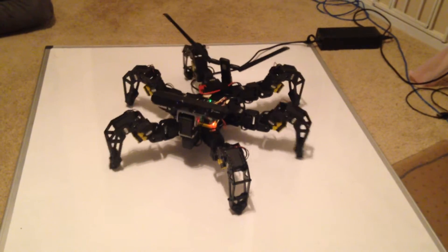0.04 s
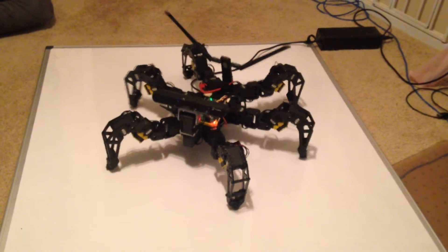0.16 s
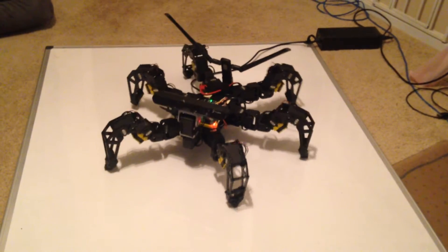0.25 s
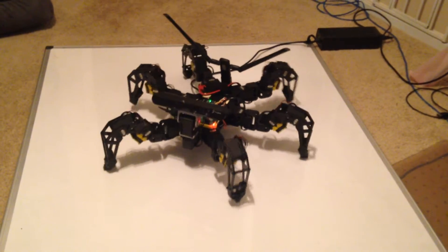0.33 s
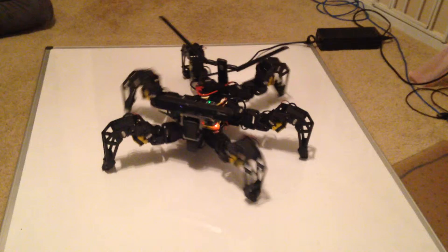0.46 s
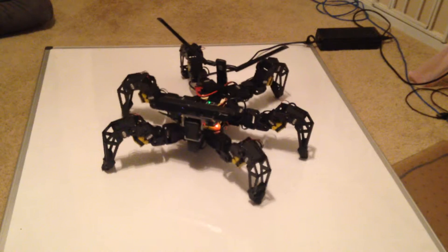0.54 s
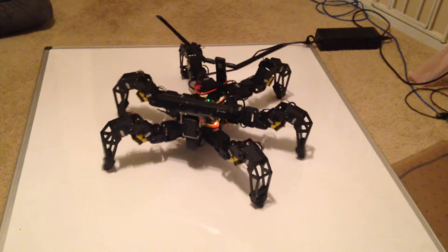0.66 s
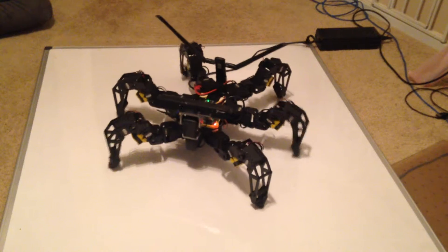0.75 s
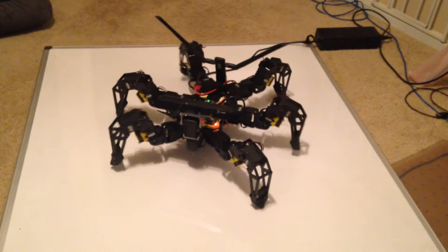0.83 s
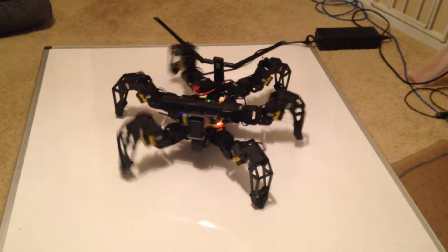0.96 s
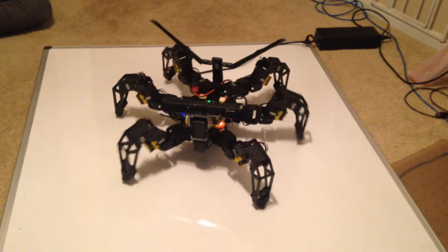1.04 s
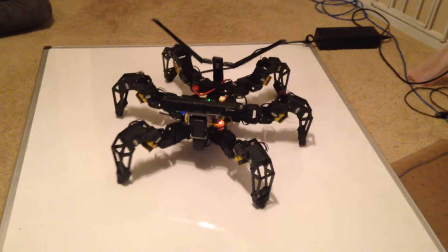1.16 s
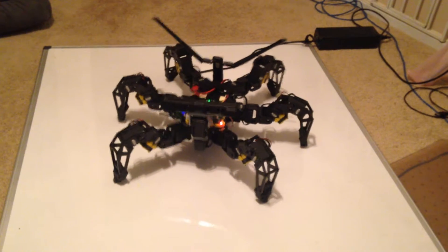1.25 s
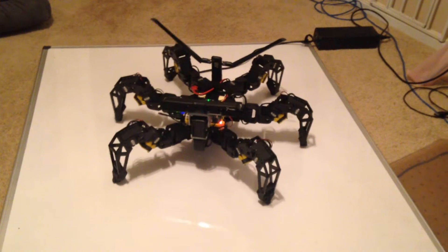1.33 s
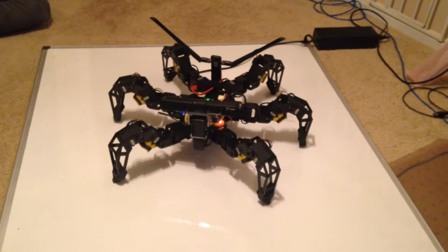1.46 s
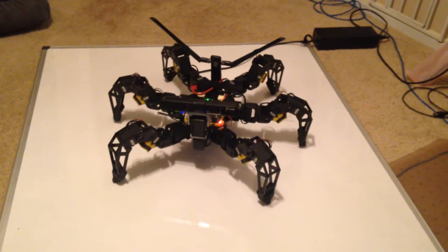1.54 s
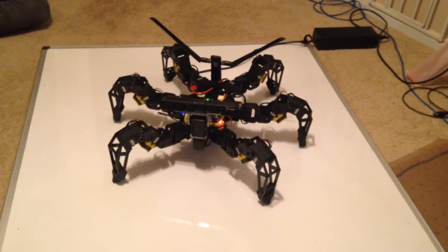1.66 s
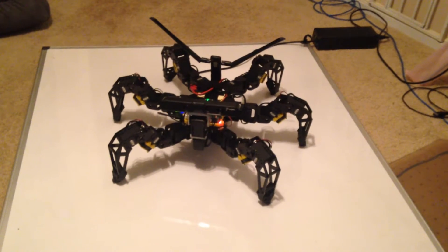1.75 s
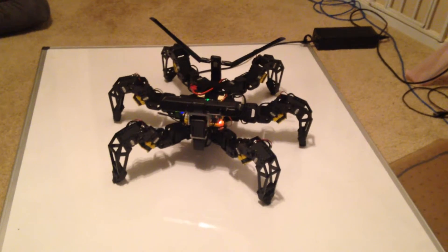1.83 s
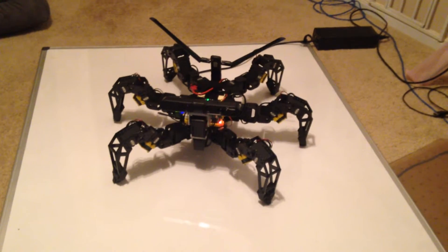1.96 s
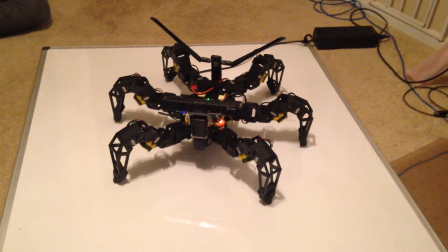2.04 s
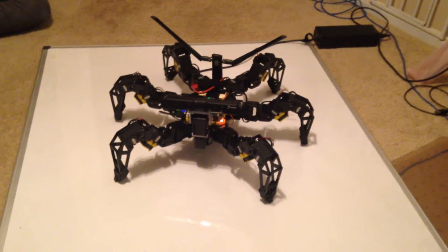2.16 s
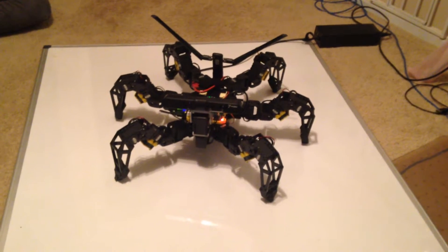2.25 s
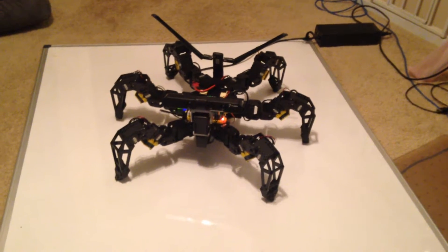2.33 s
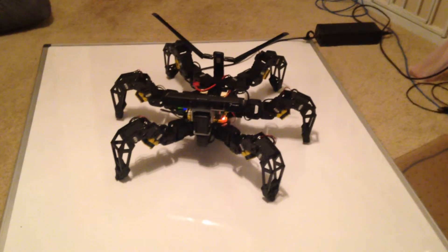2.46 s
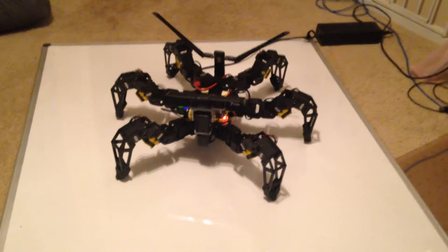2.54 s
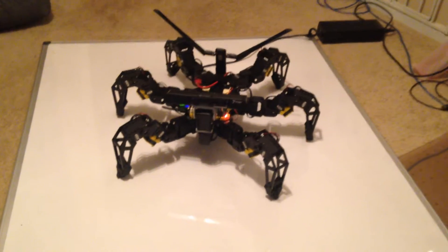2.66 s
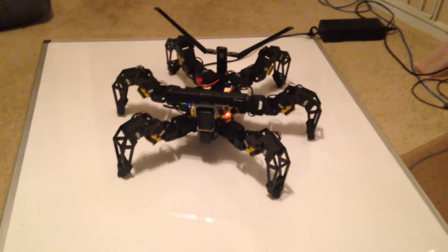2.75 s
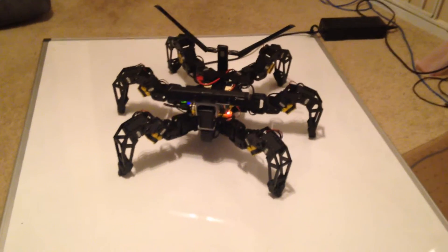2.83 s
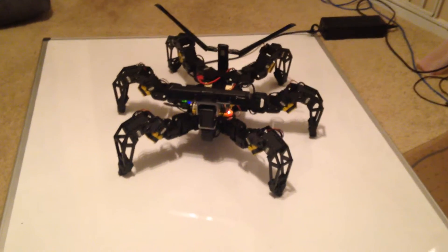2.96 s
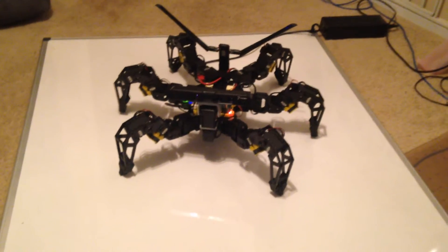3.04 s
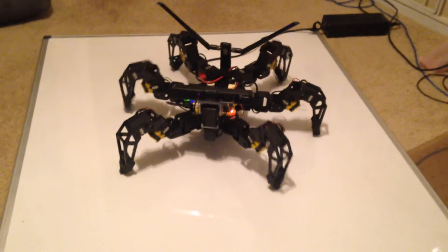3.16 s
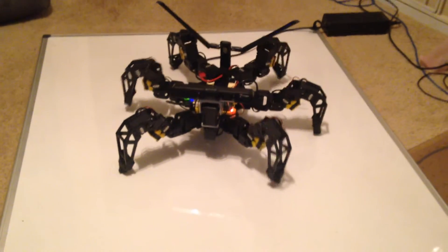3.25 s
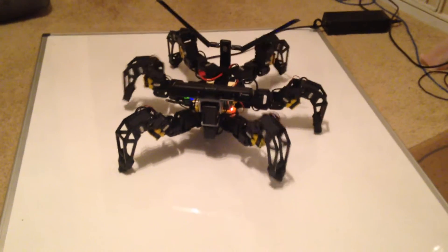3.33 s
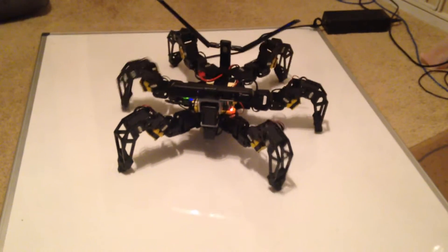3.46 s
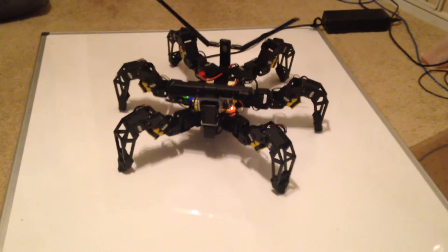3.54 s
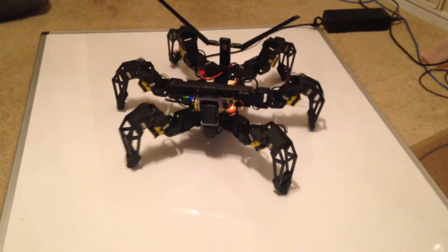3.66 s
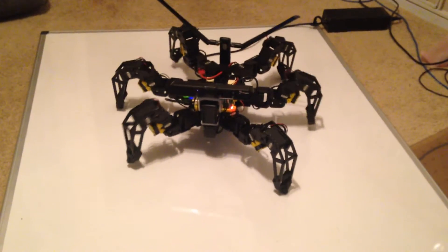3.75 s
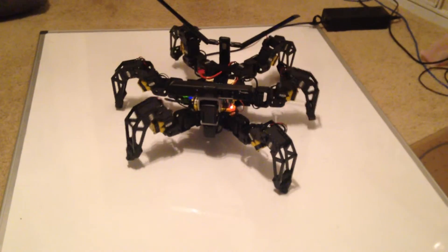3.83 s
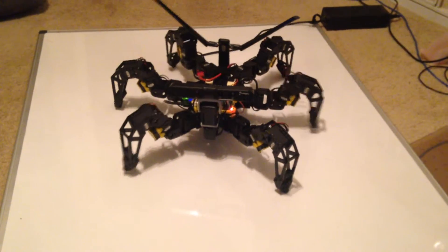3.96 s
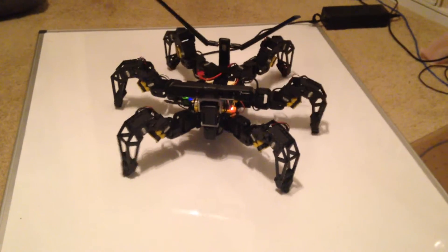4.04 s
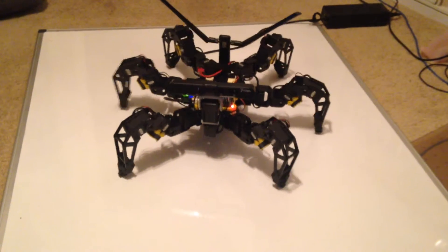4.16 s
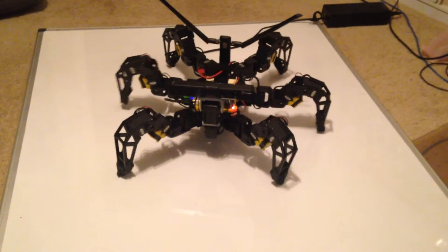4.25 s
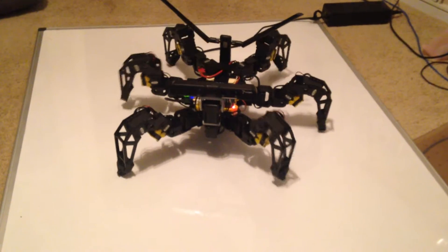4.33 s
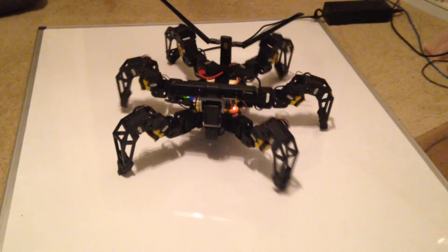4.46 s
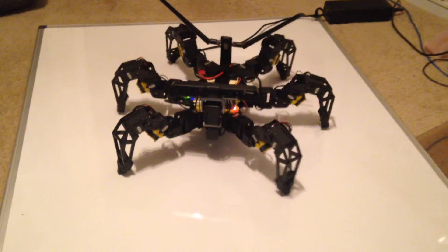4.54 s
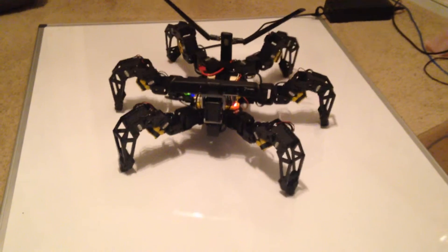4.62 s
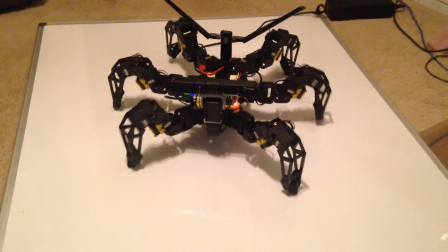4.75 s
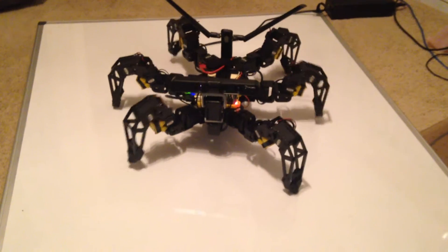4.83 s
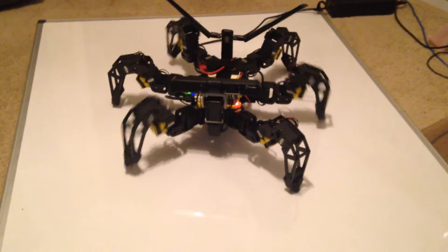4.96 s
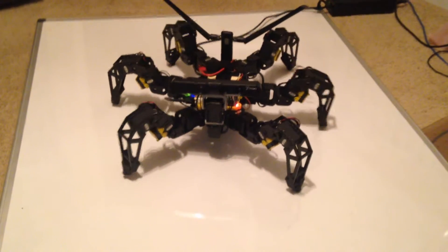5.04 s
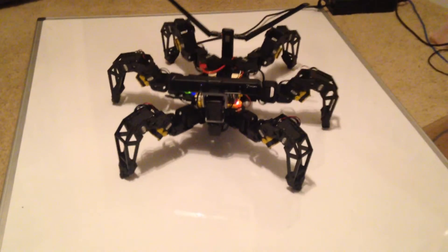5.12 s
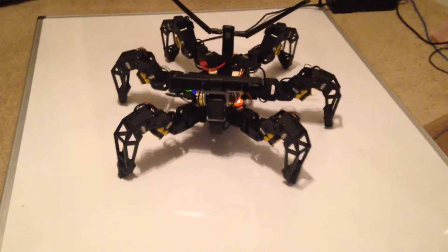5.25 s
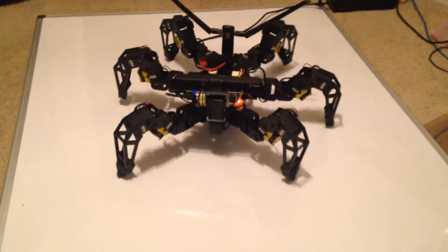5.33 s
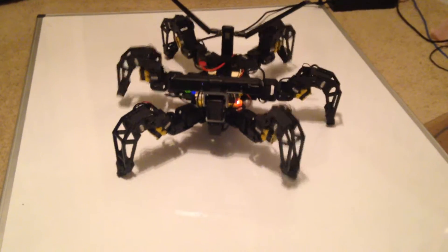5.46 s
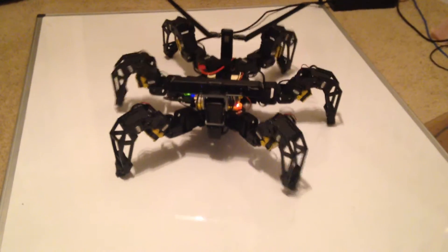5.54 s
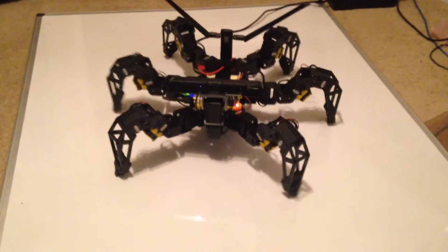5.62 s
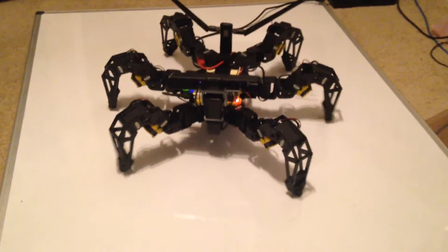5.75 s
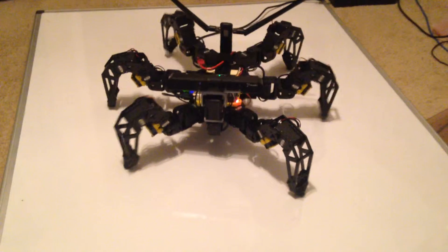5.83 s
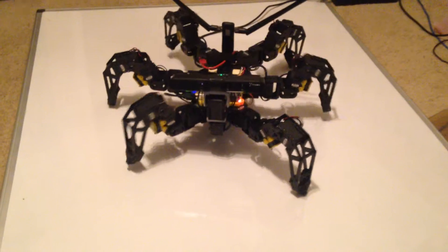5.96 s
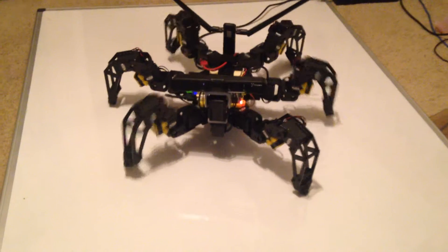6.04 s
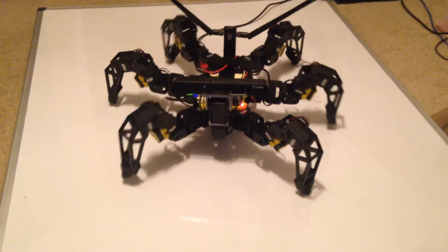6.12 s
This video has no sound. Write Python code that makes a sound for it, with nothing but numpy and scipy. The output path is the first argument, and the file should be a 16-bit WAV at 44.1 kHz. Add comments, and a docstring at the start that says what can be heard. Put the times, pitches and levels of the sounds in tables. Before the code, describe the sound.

Plastic feet thud and click on a hard board amid grainy servo rasps; a short pause leaves a low buzz and faint fan whine.

```python
"""A six-legged robot walks on a whiteboard lying on a carpet, rests for under two seconds and walks on.
Its plastic feet thump and skid by ringing the board; joints and servos add clicks, short bursts of noise.
The servos rasp in grains of noise while they move and buzz in low pulses while they hold the pose.
Small cooling fans whine as steady tones over rushing air in a quiet room."""
import sys
import numpy as np
from scipy import signal
from scipy.fft import rfft, irfft, next_fast_len
from scipy.io import wavfile

SR = 44100
rng = np.random.default_rng(int(sys.argv[2]) if len(sys.argv) > 2 else 0)


def digitize_waveform(pressure):
    """Quantize a signal to 16-bit integers and store it at the path in sys.argv[1].

    Rows of a 2-D input are taken as channels; values are limited to [-1, 1].
    """
    field = np.atleast_2d(pressure).T
    bounded = np.clip(field, -1, 1)
    quanta = np.round(bounded * 32767).astype(np.int16)
    wavfile.write(sys.argv[1], SR, quanta)


N = 272962   # length in samples
TIME = np.arange(N) / SR   # seconds


def from_db(db):
    """Turn decibels into a gain."""
    return 10 ** (np.asarray(db) / 20)


def rms_one(x):
    """Scale to an rms (average strength) of one."""
    return x / np.sqrt(np.mean(x ** 2) + 1e-20)


def in_time(rows):
    """Draw straight lines between table rows: one value per sample for each column."""
    start_s, *columns = np.transpose(rows)
    return [np.interp(TIME, start_s, column) for column in columns]


def at_hz(points, hz):
    """Read a table at any pitch, with pitch spaced in octaves (a log scale)."""
    table_hz, value = np.transpose(points)
    return np.interp(np.log(np.maximum(hz, 1)), np.log(table_hz), value)


def cut(x, hz, kind, order=2):
    """Filter away the sound outside a range of pitch (Butterworth filter)."""
    safe_hz = np.clip(hz, 10, .45 * SR)
    sections = signal.butter(order, safe_hz, kind, fs=SR, output="sos")
    return signal.sosfilt(sections, x + 1e-18)


def drift(rate_hz):
    """Wander smoothly by chance around zero, with an rms of one."""
    hz = np.fft.rfftfreq(N, 1 / SR)
    slowed = rfft(rng.standard_normal(N)) / (1 + (hz / rate_hz) ** 2)
    return rms_one(irfft(slowed, N))


def coloured(x, spectrum):
    """Shape the spectrum of a sound; white noise keeps its power."""
    size = next_fast_len(N + 4096)   # spare room at the end
    gain = from_db(at_hz(spectrum, np.fft.rfftfreq(size, 1 / SR)))
    return irfft(rfft(x, size) * rms_one(gain), size)[:N]


def add(out, start_s, sound):
    """Mix a sound in at its start time."""
    i = max(0, round(start_s * SR))
    out[i:i + len(sound)] += sound[:N - i]


def tone(hz):
    """Play a sine of rms one that follows a pitch curve."""
    return np.sqrt(2) * np.sin(2 * np.pi * np.cumsum(hz) / SR)


# the robot stands still between these times; it winds down slowly and sets off at once
REST_FROM_S, REST_TO_S = 1.544, 3.24
STOP_S, START_S = 0.091, .025   # length of each change


def walking():
    """Return 1 while the robot walks and 0 while it rests."""
    before_rest = np.clip((REST_FROM_S - TIME) / STOP_S + .5, 0, 1)
    after_rest = np.clip((TIME - REST_TO_S) / START_S + .5, 0, 1)
    return before_rest + after_rest


# three legs swap with the other three about twice a second:
# changeover_s (when the weight changes over), effort_db, stretch (times the usual duration)
STRIDES = [(0.166, -1, 0.9), (.7, .5, 1.04), (1.225, .7, 0.78), (3.11, -1.5, 1.0), (3.615, 1, 1.02),
           (4.155, -3, 0.88), (4.67, -.3, 0.92), (5.205, 1.1, 0.96), (5.77, 1, 0.99), (6.28, 1.5, 1.08)]
# the servo moves of every stride, lower, take the weight, lift, swing, before effort and stretch:
# middle_s (from the changeover), length_s, rasp_db
SERVO_MOVES = [(-.105, 0.13, -48.5), (.01, 0.2, -48.5), (0.171, 0.098, -46), (.305, 0.12, -54.5)]
# spectrum of the rasp: pitch_hz, level_db (per Hz)
RASP_COLOUR = [(500, 3), (1500, 0.5), (2600, 2.5), (3600, 7.5), (4800, 4.5), (5800, 3), (7200, 8),
               (9000, 2), (11000, 1.5), (13500, 10), (15500, 6)]
WALK_RASP_DB = -51.5   # small corrections between moves, before the trim


def gears(trim_db=0.6, grain_db=1.5, grain_rate_hz=450, flutter_db=1.0):
    """Gear teeth rasp in fine grains, swelling and fading with each move; at rest they fall silent."""
    power = from_db(WALK_RASP_DB) ** 2
    for changeover_s, effort_db, stretch in STRIDES:
        for middle_s, length_s, rasp_db in SERVO_MOVES:
            move_time = (TIME - changeover_s) / stretch - middle_s
            progress = np.clip(move_time / length_s + .5, 0, 1)
            swell = from_db(effort_db + rasp_db) * np.sin(np.pi * progress)
            power = power + swell ** 2
    grain_level_db = grain_db * drift(grain_rate_hz) + flutter_db * drift(29)
    grains = rms_one(rng.standard_normal(N) * from_db(grain_level_db))
    return from_db(trim_db) * coloured(walking() * np.sqrt(power) * grains, RASP_COLOUR)


HOLD_HZ = 218.2   # middle pitch of the holding buzz
BUZZ_WALK_DB, BUZZ_REST_DB = -63, -55.5   # base levels, walking and at rest
# overtones of the buzz: multiple (of its pitch), level_db
HOLD_ORDERS = [(1, 2), (2, -15.5), (3, -26)]
# spectrum of the pulse ticks: pitch_hz, level_db (per Hz)
TICK_COLOUR = [(1000, -24), (3500, -5), (6000, -16), (7200, 2), (11000, -17), (13200, 7), (14500, -4)]


def holding_buzz(tick_db=-6.0, waver=0.0099, sway_db=2.5, beat_depth=0.31, beat_hz=10):
    """Drive pulses hold the legs still: a low, beating buzz with thin regular ticks, loudest at rest."""
    level_db = BUZZ_REST_DB + (BUZZ_WALK_DB - BUZZ_REST_DB) * walking()
    hz = HOLD_HZ * (1 + waver * drift(8.2))
    buzz = sum(from_db(db) * tone(round(multiple) * hz) for multiple, db in HOLD_ORDERS)
    # the speed of the beating wanders around beat_hz
    beat = 1 + beat_depth * tone(beat_hz * (1 + .5 * drift(6)))
    sway = from_db(sway_db * drift(15))
    # noise that dies away afresh in every pulse
    pulse_fade = np.exp(-7 * (HOLD_HZ * TIME % 1))
    ticks = rms_one(coloured(rng.standard_normal(N) * pulse_fade, TICK_COLOUR))
    return from_db(level_db) * (beat * sway * buzz + from_db(tick_db) * ticks)


# two fans: start_s, first_hz, first_db, second_hz, second_db (blade tones, before waver and flicker)
FANS = [(0, 1072, -68.5, 1119, -78), (.8, 1072, -62, 1100, -71), (1.75, 1069, -64.5, 1118, -62),
        (2.6, 1076, -63.5, 1115, -66.5), (3.4, 1081, -59.5, 1104, -62.5), (4.3, 1080, -65, 1110, -65),
        (5.1, 1067, -63, 1118, -64.5), (6.19, 1066, -61.5, 1113, -69)]
# steady hum and whine, before waver and flicker: pitch_hz, level_db
HUM = [(86, -64), (119, -67), (193.8, -66), (387.6, -71.5), (985, -72), (1193.5, -67), (2147, -69),
       (2234, -71.5), (2385, -71), (3345, -68)]
# spectrum of the rushing air: pitch_hz, level_db (per Hz)
AIR_COLOUR = [(25, 3.5), (45, -1), (80, 8.5), (125, -0.5), (170, -1.5), (300, -10.5), (700, -9), (1500, -7),
              (2600, -4.5), (3600, 1.5), (5500, -10), (7200, -11.5), (11000, -17), (13200, -17),
              (15000, -38)]
AIR_DB = -50.5   # level of the air


def fans(flicker_db=2.5):
    """Blade tones and motor hum waver a little over a smooth rush of air."""
    first_hz, first_db, second_hz, second_db = in_time(FANS)
    lines = [(first_hz, first_db), (second_hz, second_db)] + list(HUM)
    speed = 1 + .002 * drift(10)
    flicker = flicker_db * drift(15)
    out = from_db(AIR_DB) * coloured(rng.standard_normal(N), AIR_COLOUR)
    # shifting the same waver in time keeps the tones from moving together
    shifts = rng.integers(0, N, len(lines))
    for (hz, db), shift in zip(lines, shifts):
        level = from_db(db + np.roll(flicker, shift))
        out += level * tone(hz * np.roll(speed, shift))
    return out


# short clicks: plastic joints, and a few sharp bits of the servos' rasp: start_s, level_db
CLICKS = [(0.074, -34), (.155, -38.5), (.6796, -35), (0.718, -38), (1.133, -35), (1.215, -35.5),
          (1.2646, -32), (3.6131, -32), (4.104, -37), (4.1493, -28), (4.662, -32), (5.125, -38),
          (5.2046, -30.5), (5.7614, -42)]
# spectrum of a click: pitch_hz, level_db (per Hz)
CLICK_COLOUR = [(900, -22), (2000, 1.5), (3500, 4.5), (5000, 0.5), (7500, 2), (10500, -4), (14000, -5)]


def clicks(crack_t60_s=0.0071, rattle_db=-13, rattle_t60_s=0.19):
    """Slack closing in a joint, or a sharp bit of rasp: a crack and a short rattle of fading noise."""
    level, t = np.zeros(N), TIME[:SR // 8]
    crack = from_db(-60 * t / crack_t60_s)   # t60: time to fade by 60 dB
    rattle = from_db(rattle_db - 60 * t / rattle_t60_s)
    for start_s, db in CLICKS:
        add(level, start_s, from_db(db) * (crack + rattle))
    return coloured(level * rng.standard_normal(N), CLICK_COLOUR)


# ringing tones (modes) of the board: pitch_hz, level_db (before the spot's effect), t60_s (60 dB fade)
BOARD_MODES = [(59, -10, 0.16), (112.6, -19, 0.25), (122.8, -14, 0.23), (143.8, -8.5, 0.11),
               (175, -7.5, 0.058), (186.5, -12.5, 0.12), (219.2, -9, 0.11), (240.1, -9.5, 0.19),
               (274.8, -28.5, 0.38), (306.8, -19, 0.27), (341.8, -14, 0.13), (366, -18.5, 0.089),
               (413.4, -22, 0.11), (443, -14, 0.066), (508, -26, 0.15), (547, -29, 0.22), (582, -25, 0.076),
               (667.3, -27.5, 0.15), (741.6, -25.5, 0.11), (790, -28, 0.065), (903, -16.5, 0.039),
               (1003, -24.5, 0.071), (1095, -34, 0.14), (1287, -40, 0.13), (1300, -33, 0.15),
               (1524, -48, 0.052), (1992, -27.5, 0.067), (2027, -32.5, 0.39)]


def board(force, sharp_hz, spot, shape_db=5.0, spread_hz=480, knock_db=-22, knock_t60_s=0.19,
          knock_hz=(650, 2100)):
    """A force rings the board's modes, each made stronger or weaker by the spot it hits."""
    t = TIME[:len(force)]
    # most upper modes lie too close to tell apart and make a short knock
    knock = rms_one(cut(rng.standard_normal(len(t)), knock_hz, "band"))
    ring = from_db(knock_db - 60 * t / knock_t60_s) * knock
    for k, (hz, db, t60_s) in enumerate(BOARD_MODES):
        spot_db = shape_db * np.cos(np.pi * (k + 1) * spot)
        ring = ring + from_db(db + spot_db - 60 * t / t60_s) * np.sin(2 * np.pi * hz * t)
    sound = signal.fftconvolve(force, ring)[:len(t)]
    # a soft push lasts longer and loses the highs
    sound = cut(sound, sharp_hz, "low", order=1)
    sound = cut(sound, sharp_hz * 1.56, "low", order=1)
    # bending waves spread out: the highs arrive ahead of the lows
    pole = np.exp(-2 * np.pi * spread_hz / SR)
    return signal.lfilter([-pole, 1], [1, -pole], sound)


# pushes on the board: footfalls, soft lift-offs and fresh swells of the board's ringing:
# start_s, strength_db, sharpness_hz, spot (across the board, 0-1)
PUSHES = [(0.1561, -15, 1330, .35), (0.1721, -18, 960, .51), (.203, -22, 940, .75), (0.2817, -26, 287, .72),
          (.62, -14.5, 1610, .61), (.6814, -21.5, 630, .75), (.7097, -22.5, 1140, .73),
          (0.8411, -38.5, 720, .25), (1.2128, -13, 930, 0.66), (1.23, -26.5, 990, .75),
          (1.2661, -23.5, 2740, .49), (1.358, -29.5, 180, .65), (1.4991, -40, 690, 0.25),
          (3.5372, -18.5, 1520, .14), (3.612, -13.5, 1030, 0.82), (3.6461, -28.5, 3000, .52),
          (3.7625, -42.5, 1140, .255), (4.1477, -10, 680, 0.59), (4.1528, -12, 1290, .12),
          (4.6177, -30, 690, .22), (4.6572, -21, 990, .54), (4.6617, -16.5, 600, 0.93),
          (5.1942, -31, 650, .28), (5.2038, -22, 3000, .43), (5.222, -16.5, 462, 0.9),
          (5.7296, -30.5, 507, .5), (5.745, -25.5, 350, 0.39), (5.7549, -21.5, 1010, 0.11),
          (5.903, -34, 180, 0.27)]
# a loaded foot sticks and slips:
# start_s, length_s, slips_per_s, strength_db, sharpness_hz, spot (across the board, 0-1)
SKIDS = [(.289, 0.072, 125, -30, 190, 0.46), (3.212, 0.045, 174, -28.5, 260, .8),
         (3.2369, 0.038, 155, -27, 1010, .42), (4.256, 0.054, 145, -27.5, 282, 0.72),
         (4.787, 0.035, 231, -37, 210, 0.84), (5.332, 0.047, 141, -28, 497, .73),
         (5.372, 0.07, 122, -39, 220, 0.42)]


def pushes_and_skids(leak_hz=88, unevenness=0.058):
    """Each push is one impulse on the board, each skid a swelling and fading run of small ones."""
    out, t, grip = np.zeros(N), TIME[:SR // 2], drift(80)
    for start_s, db, sharp_hz, spot in PUSHES:
        push = signal.unit_impulse(len(t))
        add(out, start_s, from_db(db) * board(push, sharp_hz, spot))
    for start_s, length_s, rate, db, sharp_hz, spot in SKIDS:
        # a slip happens each time the count reaches a new whole number
        wobble = unevenness * np.interp(start_s + t, TIME, grip)
        slips = np.diff(np.floor(rate * t + .5 + wobble), prepend=0)
        swell = np.sin(np.pi * np.minimum(t / length_s, 1))
        add(out, start_s, from_db(db) * board(slips * swell, sharp_hz, spot))
    # the deepest sound leaks round the board's edge
    return cut(out, leak_hz, "high", order=4)


# a leg that lands stiffly clacks: start_s, level_db
CLACKS = [(0.6207, -33), (4.1485, -23.5), (4.1532, -27.5)]
# ringing tones of the hollow plastic leg: pitch_hz, level_db, t60_s (60 dB fade)
LEG_MODES = [(875, -2.5, 0.028), (1030, -3, 0.016), (1230, -6.5, 0.023), (1896, -18.5, .07)]


def legs():
    """A stiff landing rings the plastic leg for a moment."""
    out, t = np.zeros(N), TIME[:SR // 8]
    ring = sum(from_db(db - 60 * t / t60_s) * np.sin(2 * np.pi * hz * t) for hz, db, t60_s in LEG_MODES)
    for start_s, db in CLACKS:
        add(out, start_s, from_db(db) * ring)
    return out


# the board lifts and settles on the carpet with a soft low bump: start_s, level_db
BUMPS = [(.92, -43), (1.126, -45), (1.912, -44), (2.68, -48), (2.935, -43), (4.906, -48), (5.91, -43)]


def bumps(hz=58, rise_s=0.0079):
    """The whole board makes a few slow swings that rise and die away."""
    out, t = np.zeros(N), TIME[:SR // 4]
    swell = t / rise_s * np.exp(1 - t / rise_s)
    for start_s, db in BUMPS:
        add(out, start_s, from_db(db) * swell * np.sin(2 * np.pi * hz * t))
    return out


# how fast the room's tail dies: pitch_hz, t60_s (60 dB fade)
ROOM_T60 = [(100, 0.37), (400, 0.27), (2000, 0.22), (12000, 0.099)]


def room(x, tail_db=-13, build_s=0.0047, tail_low_hz=300):
    """A carpeted room adds a short tail of fading noise that dies fastest in the treble."""
    t, tail = TIME[:SR // 2], 0
    edges = np.geomspace(60, 16000, 9)   # eight bands of pitch, in Hz
    for low, high in zip(edges, edges[1:]):
        t60_s = at_hz(ROOM_T60, np.sqrt(low * high))
        band = cut(rng.standard_normal(len(t)), [low, high], "band")
        tail = tail + band * from_db(-60 * t / t60_s)
    tail = cut(tail * (1 - np.exp(-t / build_s)), tail_low_hz, "high", order=1)
    tail = tail / np.sqrt(np.sum(tail ** 2))
    return x + from_db(tail_db) * signal.fftconvolve(x, tail)[:N]


def scene():
    """Mix the robot, its board and its fans; pushes, skids, clacks and clicks also get the room's tail."""
    knocks = room(pushes_and_skids() + legs() + clicks())
    mix = knocks + bumps() + gears() + holding_buzz() + fans()
    return mix[None]   # one channel


def record(dry):
    """The small microphone loses the deepest bass; the top is cut steeply."""
    sound = cut(dry, 58, "high")
    top_cut = signal.ellip(12, .1, 80, 15450, fs=SR, output="sos")   # cut above 15450 Hz
    return signal.sosfilt(top_cut, sound)


dry = scene()
out = record(dry)
digitize_waveform(out)
```